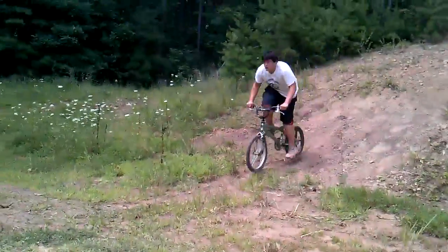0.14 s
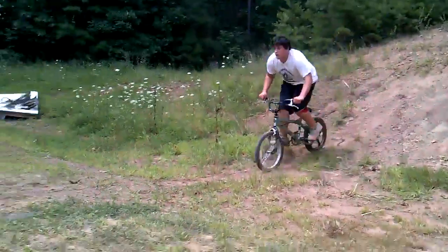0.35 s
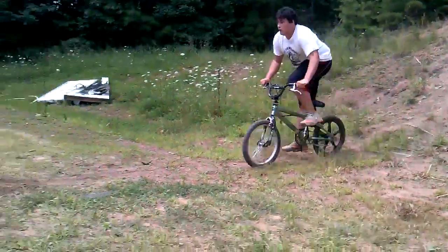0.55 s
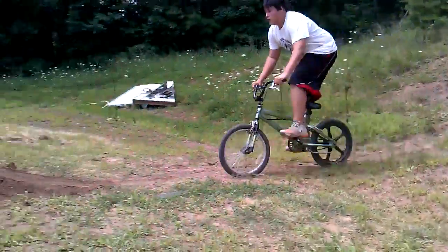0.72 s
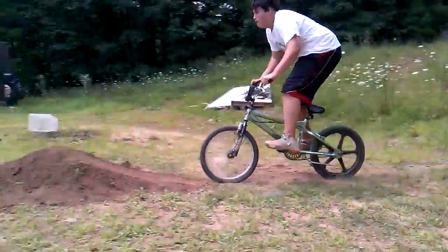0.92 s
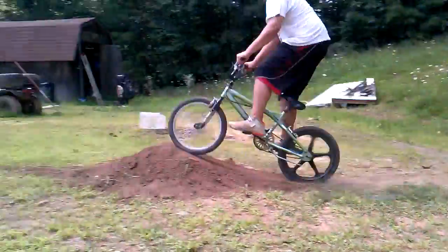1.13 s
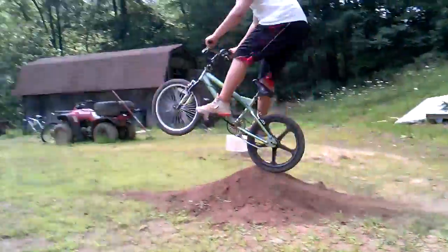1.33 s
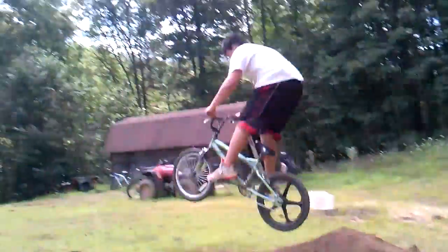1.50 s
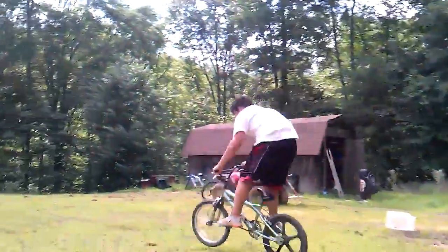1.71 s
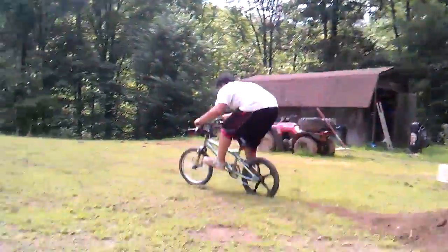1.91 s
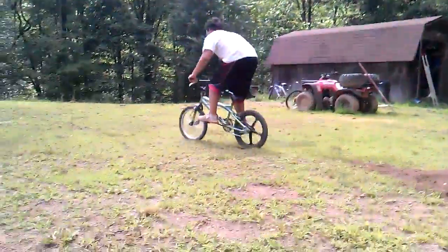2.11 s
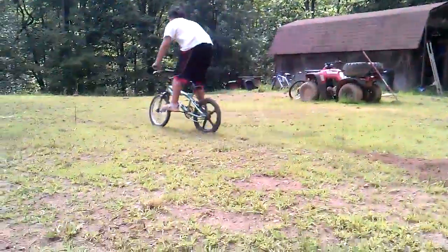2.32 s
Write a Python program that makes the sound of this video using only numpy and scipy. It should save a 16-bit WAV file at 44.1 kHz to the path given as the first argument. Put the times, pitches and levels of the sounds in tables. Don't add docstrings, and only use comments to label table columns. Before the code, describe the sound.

Bicycle tyres crunch close by, chain ticks sharpen into a loud slap at the mound, a lighter airborne rattle follows, then a landing clank and fading rattles on grass, with faint insects and leaves, heard through a phone.

```python
import sys
import numpy as np
from scipy import signal
from scipy.fft import rfft, irfft
from scipy.io import wavfile
from scipy.ndimage import uniform_filter1d

SR = 44100
rng = np.random.default_rng(int(sys.argv[2]) if len(sys.argv) > 2 else 0)


def ratio(d):
    e = np.asarray(d, float) / 20
    return 10 ** e


def unload_wav(signal):
    wavfile.write(
        sys.argv[1],
        SR,
        np.round(np.clip(np.atleast_2d(signal).T, -1, 1) * 32767).astype(np.int16),
    )


N = 103635


def unit(x):
    return x / np.sqrt(np.mean(x ** 2))


def curve(rows):
    return np.interp(np.arange(N) / SR, *np.array(rows, float).T)


def peak(x, hz, width_hz):
    return signal.lfilter(*signal.iirpeak(hz, hz / width_hz, fs=SR), x)


def peak_twice(x, hz, width_hz):
    return peak(peak(x, hz, width_hz), hz, width_hz)


def walk(rate_hz):
    hold = int(SR / rate_hz)
    steps = np.repeat(rng.standard_normal(N // hold + 1), hold)
    return 1.01 * uniform_filter1d(uniform_filter1d(steps, hold), hold)[:N]


def grains(per_s, spread_db):
    hit = np.clip((per_s / SR - rng.random(N)) * SR / 200, 0, 1)
    sign = rng.choice([-1., 1.], size=N)
    return hit * sign * ratio(spread_db * np.minimum(rng.exponential(size=N), 4.0))


def ring(hz, db, t60, size, contact_s=0.00016):
    t = np.arange(size)[:, None] / SR
    build = np.sin(np.pi / 2 * np.minimum(t / contact_s, 1)) ** 2
    decay = ratio(-60 * t / np.maximum(t60, .002))
    return (build * ratio(db) * np.sin(2 * np.pi * hz * t) * decay).sum(axis=1)


def add(out, at_s, db, x):
    i = max(int(at_s * SR), 0)
    x = x[:N - i] * ratio(db) / np.abs(x).max()
    out[i:i + len(x)] += x


# f/Hz, level/dB per Hz
YARD_SPECTRUM = [(24, -31), (60, -4), (260, -7), (368, -15.5), (778, -7), (5050, -27), (6980, -4),
                 (15500, -37)]


def yard():
    hz = np.fft.rfftfreq(N, 1 / SR) + 1
    table_hz, table_db = np.array(YARD_SPECTRUM, float).T
    tilt = ratio(np.interp(np.log(hz), np.log(table_hz), table_db))
    air = irfft(rfft(rng.standard_normal(N)) * tilt, N)
    bugs = peak_twice(rng.standard_normal(N), 6400, 2100)
    return unit(air) * ratio(-49.5 + 7.7 * walk(6.44)) + unit(bugs) * ratio(-64 + 7.5 * walk(59.6))


# f/Hz, width/Hz, level/dB
TYRE_MODES = [(76, 69, -12), (258, 145, -2.5), (637, 494, -0.5), (989, 530, -5.5), (1686, 703, 3.5),
              (2100, 740, 0.5), (2890, 1800, -2.5), (5040, 2600, -9.5)]
# t/s, level/dB
ROLL_LEVEL = [(0, -40.5), (.17, -44), (.3, -44), (.4, -42), (.58, -35), (.9, -40), (1.1, -34.5),
              (1.24, -42), (1.36, -48), (1.45, -54), (1.71, -61.5), (1.74, -47.5), (1.82, -33), (1.87, -39),
              (1.94, -40.5), (2.0, -46.5), (2.12, -53.5), (2.35, -55.5)]
# t/s, level/dB
ROUGHNESS = [(0, -7), (.15, 4.5), (.3, 4), (.55, 0.5), (.9, -3), (1.15, 3.5), (1.35, -1), (1.75, -2),
             (1.88, 1.5), (2.05, 0.5), (2.35, -1)]


def tyres():
    grit = grains(3150, 2.5)
    bump = walk(29.96)
    body = np.zeros(N)
    for hz, width_hz, db in TYRE_MODES:
        boom = (hz < 400) * curve(ROUGHNESS)
        level_db = db + 1.57 * bump + 2.25 * walk(44.75) + boom
        body += ratio(level_db) * unit(peak_twice(grit, hz, width_hz * 1.235))
    return unit(body) * ratio(curve(ROLL_LEVEL) + 2.5)


# f/Hz, level/dB, t60/s
CHAIN_MODES = [(5170, -4, 0.0078), (6260, -62, 0.13), (6950, -10.5, 0.17), (7230, 2.5, 0.032),
               (7920, -1.5, 0.044), (8515, 0, 0.039), (9200, 4.5, 0.034), (9650, -8, 0.015),
               (9996, -3, 0.055), (10720, -3, 0.03), (11650, -11.5, 0.013), (12800, -9, 0.0043),
               (14570, -2.5, 0.012)]
# t/s, level/dB
SHAKE_LEVEL = [(0, -41), (.16, -40.5), (.5, -34.5), (.9, -37.5), (1.07, -32.5), (1.22, -36), (1.42, -44.5),
               (1.7, -54), (1.76, -39.5), (1.85, -29.5), (1.9, -35), (2.0, -43), (2.14, -46.5),
               (2.35, -47.5)]


def rattle():
    ticks = unit(grains(4920, 4)) + 0.56 * rng.standard_normal(N)
    ticks = ticks * ratio(3.9 * walk(40.98))
    body = np.zeros(N)
    for k, (hz, db, _) in enumerate(CHAIN_MODES):
        late = np.roll(ticks, k * 53)
        mode = peak(peak(late, hz, hz * 0.078), hz, hz * 0.76)
        body += ratio(db + 0.99 * walk(12.2)) * mode
    dull = signal.lfilter(*signal.butter(2, 11500, fs=SR), body)
    return unit(dull) * ratio(curve(SHAKE_LEVEL))


def brake():
    t = np.arange(N) / SR
    press = np.clip((t - 0.28) / 0.39, 0.19, 1)
    release = np.exp(-np.maximum(t - 0.91, 0) / 0.055)
    hz, width_hz = 3845, 440
    rub = peak(peak(grains(3350, 0.75), hz, width_hz), hz, width_hz * 12.0)
    return unit(rub) * ratio(-37 + 1.3 * walk(29.86)) * press * release


# t/s, peak level/dB, f/Hz
WHEEL_HITS = [(0.002, -32.5, 66.4), (0.034, -25, 326), (0.185, -27, 480), (0.192, -27, 136),
              (0.193, -22.5, 395), (0.228, -23.5, 317), (0.281, -29, 296), (0.712, -41, 278),
              (1.089, -33, 224), (1.139, -28.5, 231), (1.17, -30, 315), (1.31, -35.5, 300),
              (1.495, -49, 332), (1.718, -32.5, 194), (1.786, -40, 220), (1.803, -18, 106),
              (1.823, -22, 125), (1.86, -34, 258), (1.917, -33, 209)]


def thuds():
    out, size = np.zeros(N), 6000
    t = np.arange(size) / SR
    for at_s, db, hz in WHEEL_HITS:
        t60 = 3.96 / hz
        soil = peak(peak(rng.standard_normal(size), hz * 1.9, hz * 4.6), hz, hz * 6.8)
        scuff = soil * ratio(-60 * t / (0.91 * t60)) * np.minimum(t / 0.0051, 1)
        body = ring(hz * np.array([.4, 1, 1.7]), np.array([-6, 0, -8]), t60, size, contact_s=0.0028)
        add(out, at_s, db, body + ratio(7.5) * scuff)
    return out


def chain(near_hz, focus_db, scatter_db, damp):
    hz, db, t60 = np.repeat(np.array(CHAIN_MODES, float), 5, axis=0).T
    detune, scatter = rng.standard_normal((2, len(hz)))
    near = focus_db * np.exp(-(np.log2(hz / near_hz) / 0.41) ** 2)
    strength = np.log(np.maximum(np.abs(scatter), .3))
    decay_s = t60 * damp * ratio(scatter_db * scatter)
    return ring(hz * (1 + 0.0258 * detune), db + near + scatter_db * strength, decay_s, size=1800)


# t/s, peak level/dB, centre f/Hz, bounce length/ms
MORE_SLAPS = [
    (0.0647, -13, 10000, 0.28),
    (0.2676, -12.5, 10000, 1.84),
    (0.3055, -7.5, 8700, 1.1),
    (0.5432, -6, 8900, 0.92),
    (1.3326, -14, 10900, 2.9),
    (1.6024, -13, 9500, 4.2),
    (1.7738, -6.5, 9200, 2),
]
# t/s, peak level/dB, centre f/Hz, bounce length/ms
RUN_UP_SLAPS = [(0.2251, -12, 9000, 2.5), (0.532, -18, 8800, 1.3), (0.605, -18.5, 9300, 1.9),
                (0.6384, -17.5, 8800, 2), (0.6667, -14.5, 8500, 4.2), (0.7353, -22, 7200, 2),
                (0.7871, -20, 7190, 1.8), (0.824, -17, 9200, 6.2), (0.861, -10, 9200, .6),
                (0.8712, -14.5, 9200, 2.1), (0.9213, -14, 8250, 4.4), (0.9304, -17.5, 7200, 2.3),
                (0.9448, -10, 7850, 8.5), (0.9718, -15, 9000, 2.2), (0.9965, -17, 9500, 1.5),
                (0.9988, 2.5, 9800, 4.4), (1.0018, -7, 9550, 4), (1.0025, -2.5, 6800, 2.6),
                (1.0075, -7, 6800, 1.9), (1.0125, -29, 6840, 2.3), (1.017, -14, 10400, 2.5),
                (1.0535, -13, 8250, 1.75), (1.0597, -10, 8350, 2.5), (1.0988, -16, 9500, 2.4),
                (1.1938, -16, 10000, 4)]
# t/s, peak level/dB, centre f/Hz, bounce length/ms
JUMP_SLAPS = [(1.2352, -9, 7700, 8.3), (1.3089, -17, 9350, 2.2), (1.3754, -10.5, 7900, 8.1),
              (1.3934, -18, 8400, 3.2), (1.41, -25, 9200, 3), (1.446, -28, 9200, 1.7),
              (1.458, -28, 9200, 4), (1.478, -29, 9200, 2.8), (1.4872, -12, 8100, 9.4),
              (1.6045, -15.5, 7000, 3.5), (1.628, -24, 5300, 0.58), (1.6354, -24, 7200, 3.6),
              (1.7278, -22, 8600, 2.3), (1.7323, -11, 10700, 3.1), (1.7587, -16, 7440, 2),
              (1.7642, -6, 9000, 1.76), (1.7792, -12, 9550, 5.9), (1.7875, -18, 9000, 7.1),
              (1.8125, -15, 9000, 4.8), (1.8188, -6, 9300, 11), (1.8275, -3, 8950, 1.7),
              (1.8302, 0, 9900, 1.8), (1.8372, -11, 8900, 5.1), (1.8488, -14.5, 9200, 5),
              (1.856, -11, 9500, 7.2), (1.8635, -12, 9350, 2), (1.8986, -16.5, 9650, 3.8),
              (1.9238, -17.5, 6400, 1.6), (1.9278, -16, 10100, 13), (1.972, -25, 9700, 2.4),
              (2.0193, -26, 9000, 8.2), (2.0416, -25.5, 9100, 5.2), (2.0988, -23.5, 6350, 11)]


def slaps():
    out, size = np.zeros(N), 4000
    t = np.arange(size) / SR
    for at_s, db, hz, ms in list(MORE_SLAPS) + list(RUN_UP_SLAPS) + list(JUMP_SLAPS):
        rise = np.minimum(t / (0.0013 + .06 * ms / 1000) + 0.39, 1)
        bounce = np.exp(-(t * 1000 / max(ms, .2)) ** 0.91)
        tail = ratio(-26.5) * np.exp(-t / 0.0086)
        hit = np.clip((6.23 * 1000 / SR - rng.random(size)) * 200, 0, 1)
        links = hit * rng.standard_normal(size) * rise * (bounce + tail)
        links[0] = 2.3 * (ms < 2)
        damp = 0.45 * min(ms / 4.1 + 0.36, 1)
        add(out, at_s, db, signal.fftconvolve(links, chain(hz, 15, 3.5, damp)))
    return out


# t/s, peak level/dB, f/Hz
TUBE_KNOCKS = [(0.228, -21, 2360), (0.269, -27, 2820), (0.276, -35, 1940), (0.278, -28.5, 766),
               (0.736, -23.5, 1610), (0.81, -17, 2020), (1.001, -19.5, 1440), (1.004, -18.5, 3330),
               (1.05, -12.5, 1830), (1.088, -24, 1980), (1.235, -23, 2200), (1.309, -23, 2470),
               (1.375, -28.5, 1490), (1.378, -22.5, 2260), (1.49, -28, 2390), (1.492, -26, 1480),
               (1.498, -28, 790), (1.562, -37, 940), (1.631, -31, 1630), (1.723, -28.5, 1480),
               (1.729, -22, 2210), (1.758, -24, 2160), (1.786, -28, 2010), (1.801, -24, 2450),
               (1.821, -4.5, 2088), (1.836, -19, 2130), (1.85, -20, 1920), (1.86, -29, 1800),
               (1.89, -22.5, 1600), (1.904, -34, 2060), (1.917, -12.5, 1810), (1.926, -29, 1920),
               (1.935, -22, 1950), (1.948, -26, 1830), (1.972, -23.5, 2100), (1.993, -31, 1520),
               (1.998, -28, 1440), (2.015, -31, 2000), (2.1, -32, 2230)]


def knocks():
    out = np.zeros(N)
    t = np.arange(400) / SR
    for at_s, db, hz in TUBE_KNOCKS:
        detune, uneven = rng.standard_normal((2, 5))
        tones_hz = hz * np.array([.52, .82, 1, 1.18, 1.5]) * (1 + 0.048 * detune)
        tones_db = np.array([-14.5, -11.5, 0.5, -12, -8]) + 2 * uneven
        body = ring(tones_hz, tones_db, 0.017, size=2000, contact_s=0.00053)
        touch = rng.standard_normal(400) * np.exp(-t / 0.00017)
        add(out, at_s, db, signal.fftconvolve(touch, body))
    return out


def scene():
    bike = tyres() + rattle() + brake() + thuds() + slaps() + knocks()
    t = np.arange(SR // 3) / SR
    scatter = rng.standard_normal(len(t)) * ratio(-60 * t / .2) * (t > .004)
    wet = signal.fftconvolve(bike, scatter / np.sqrt(np.sum(scatter ** 2)))[:N]
    return (bike + ratio(-19) * wet + yard())[None]


def roll_off(x):
    return signal.sosfilt(signal.butter(12, 16820, fs=SR, output="sos"), x)


def record(dry):
    x = signal.lfilter(*signal.butter(1, 45, "high", fs=SR), dry)
    x = .8 * np.tanh(x / .8)
    x = signal.sosfilt(signal.ellip(8, .2, 70, 15800, fs=SR, output="sos"), x)
    return roll_off(x)


dry = scene()
out = record(dry)
unload_wav(out)
```